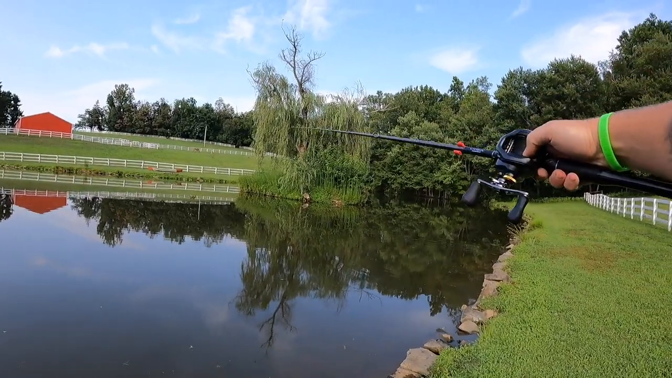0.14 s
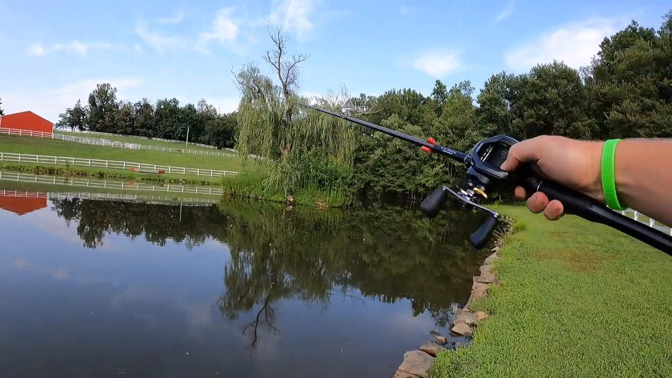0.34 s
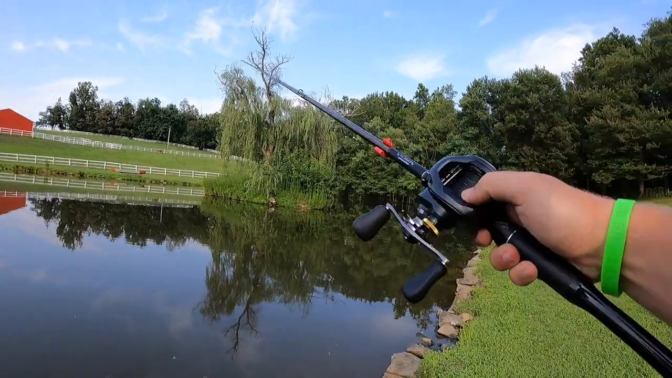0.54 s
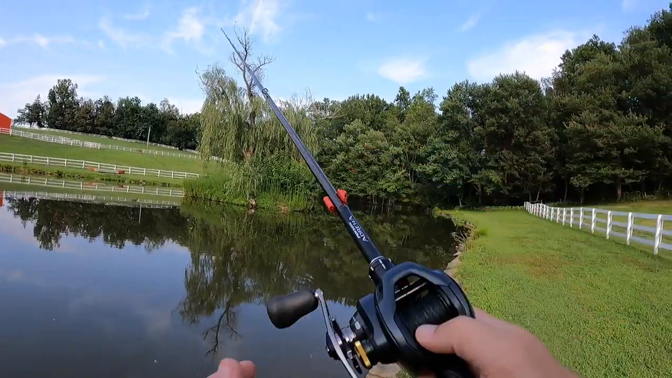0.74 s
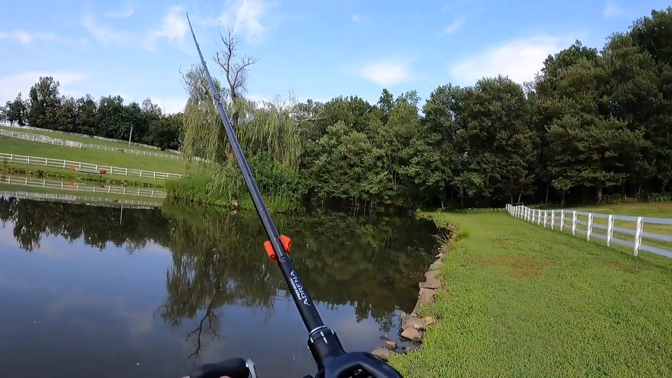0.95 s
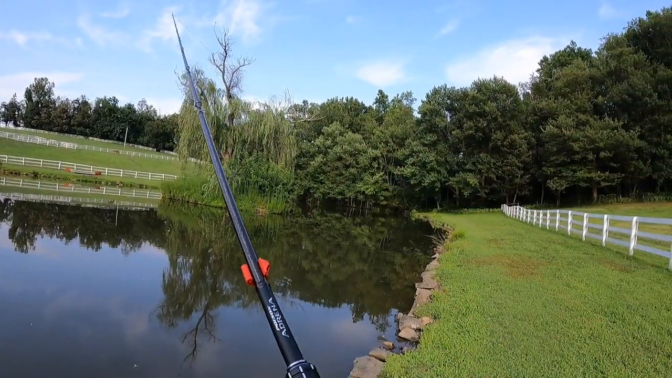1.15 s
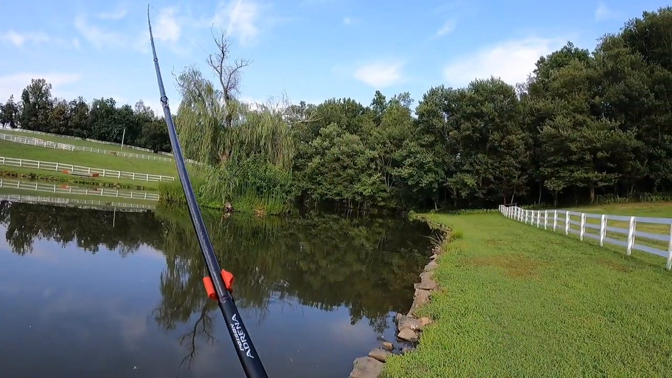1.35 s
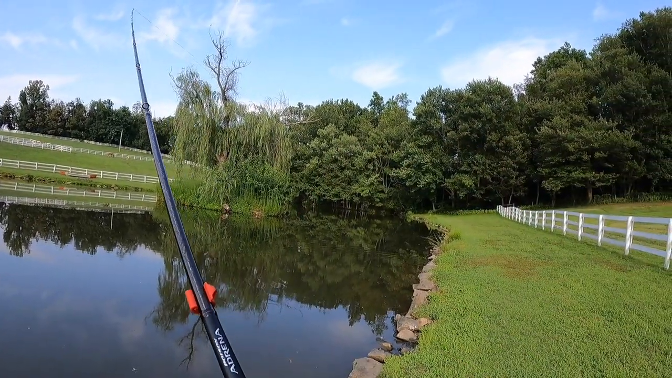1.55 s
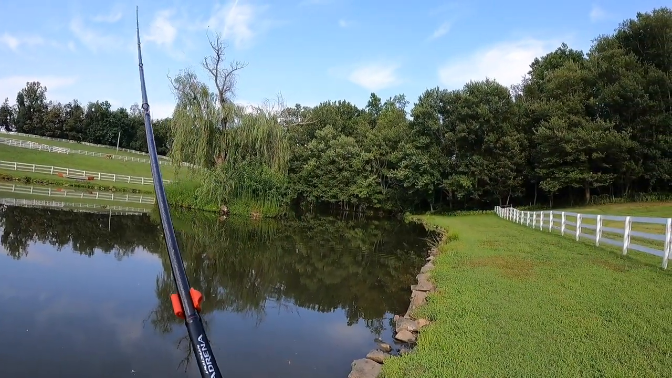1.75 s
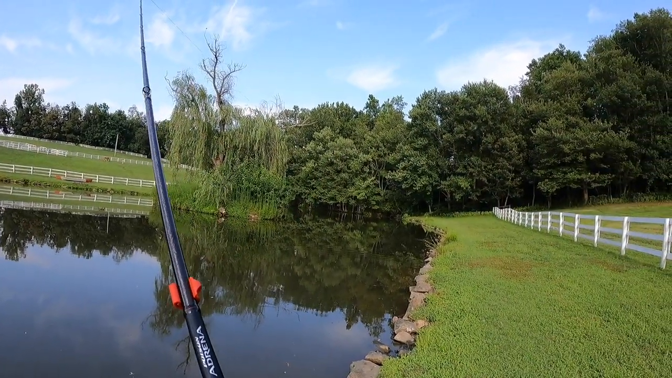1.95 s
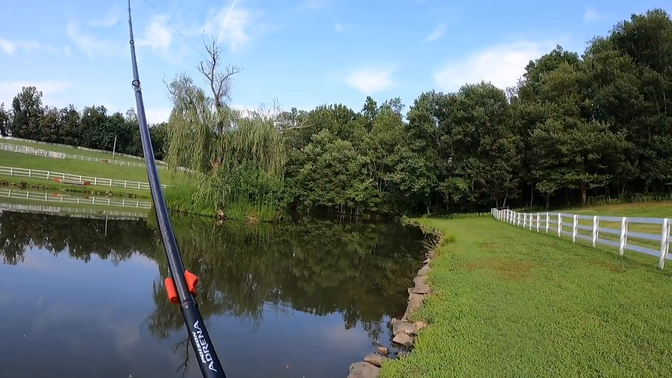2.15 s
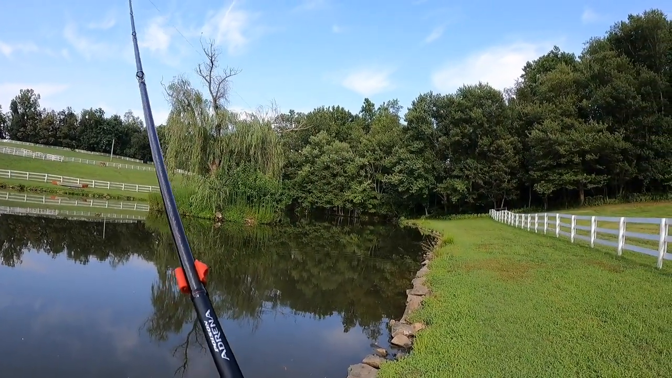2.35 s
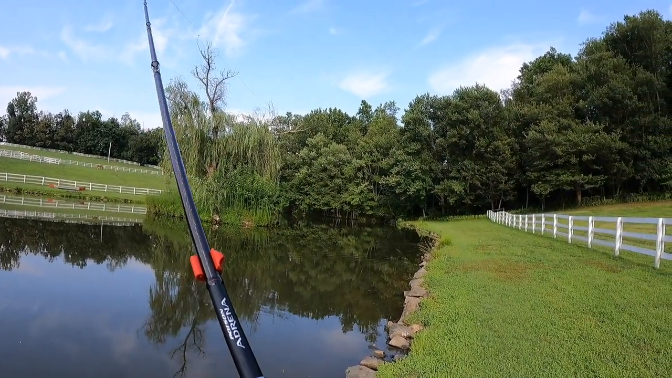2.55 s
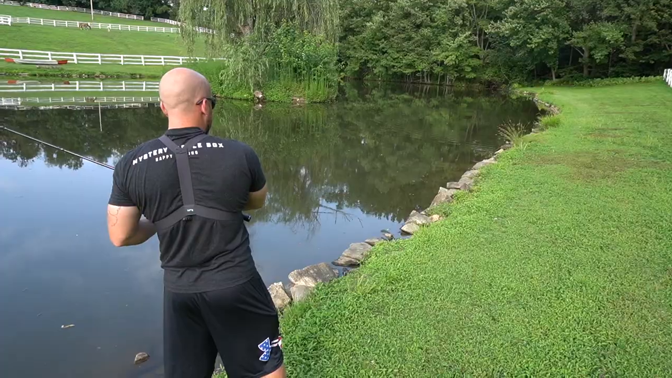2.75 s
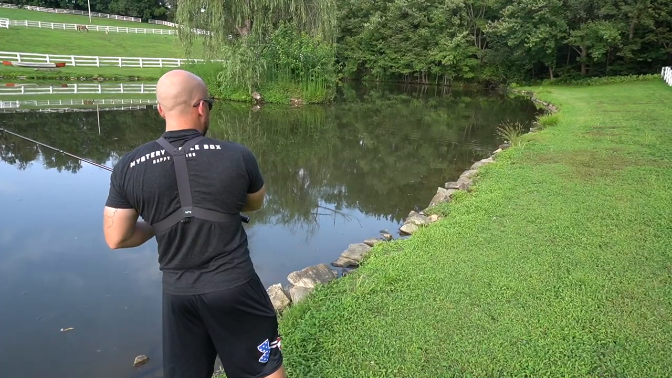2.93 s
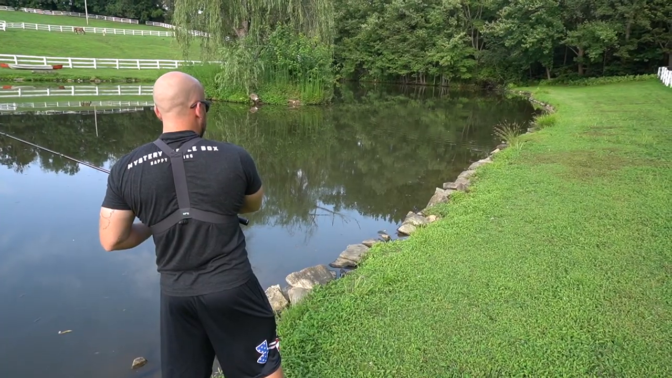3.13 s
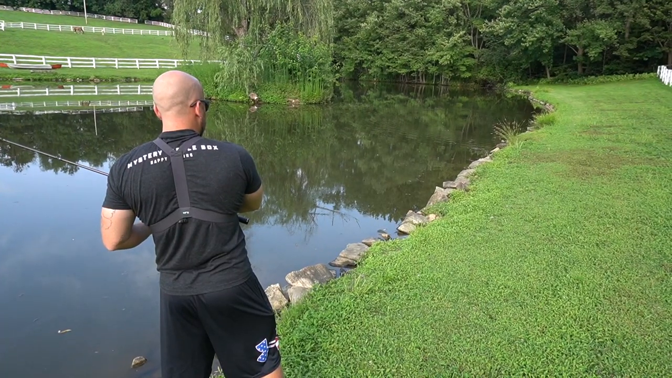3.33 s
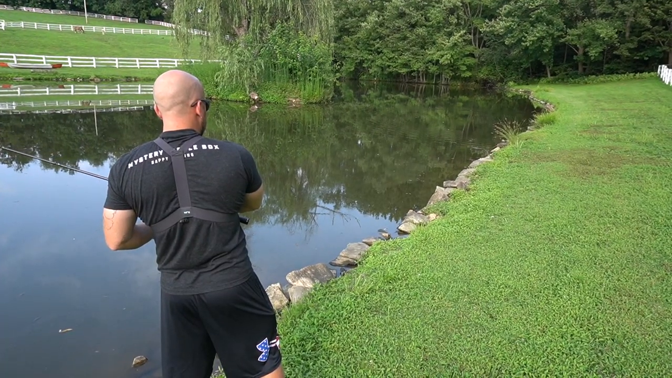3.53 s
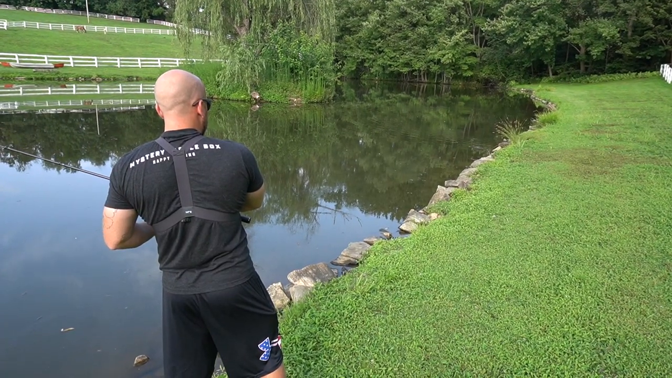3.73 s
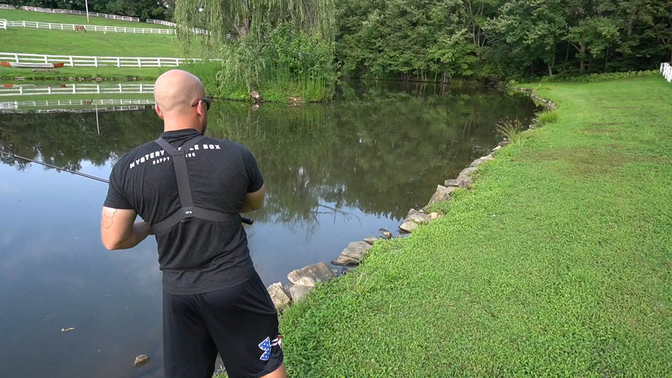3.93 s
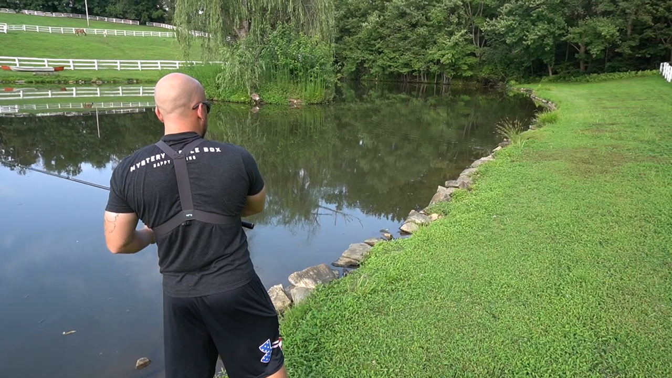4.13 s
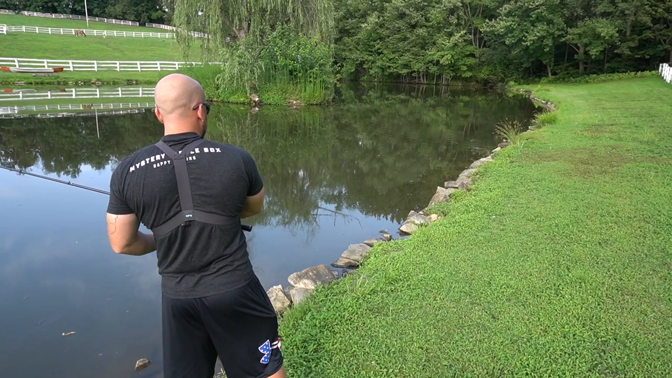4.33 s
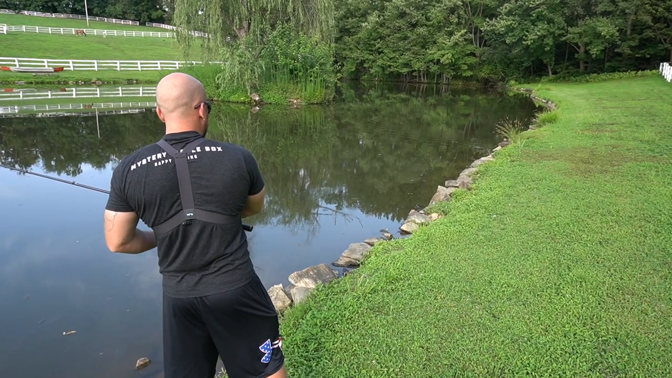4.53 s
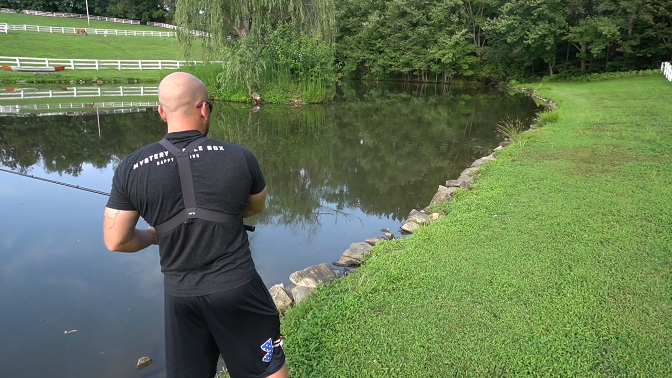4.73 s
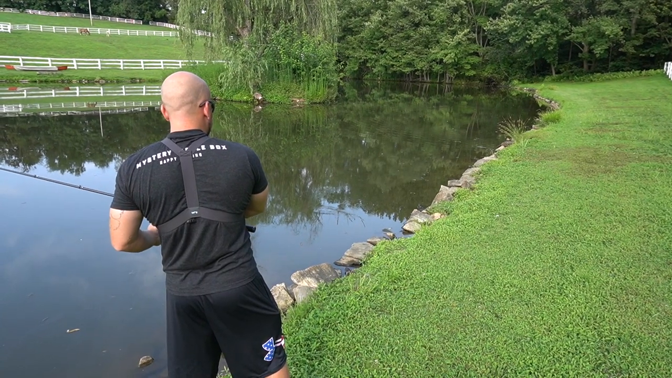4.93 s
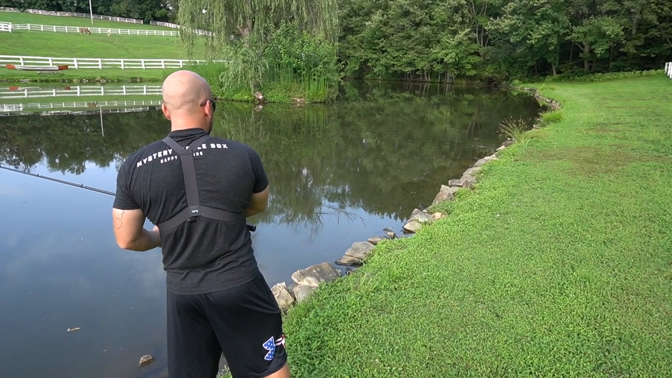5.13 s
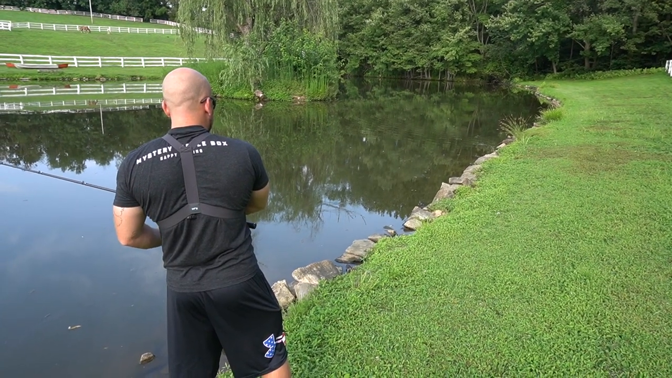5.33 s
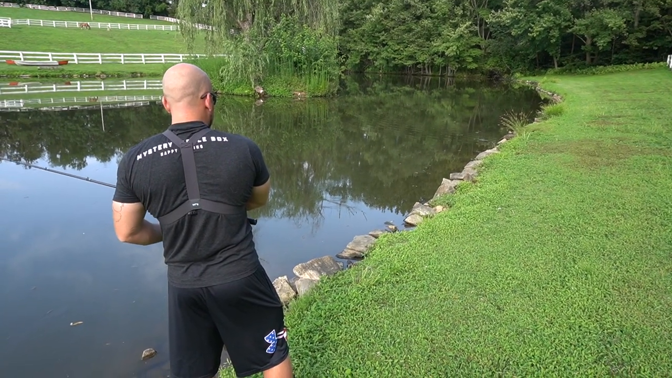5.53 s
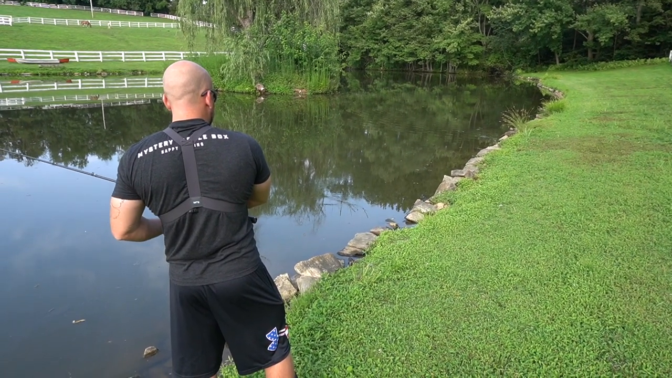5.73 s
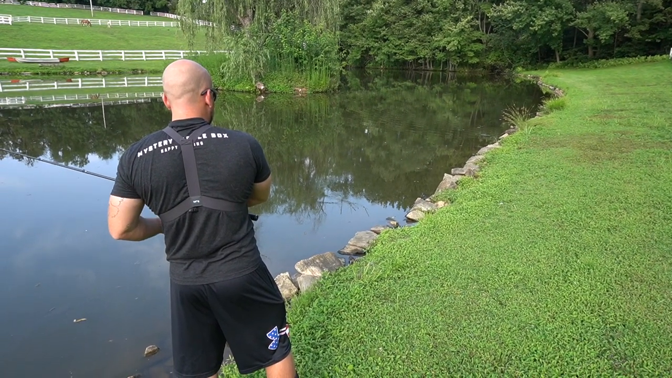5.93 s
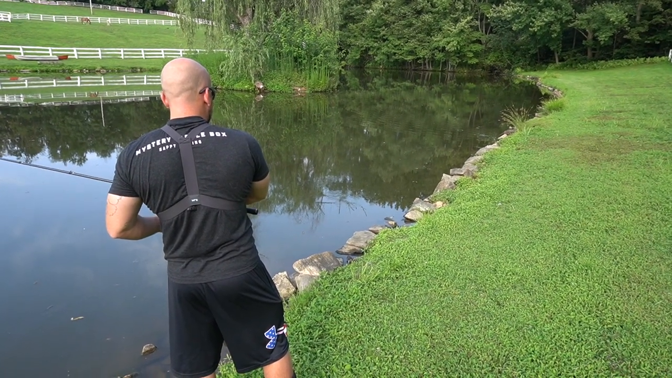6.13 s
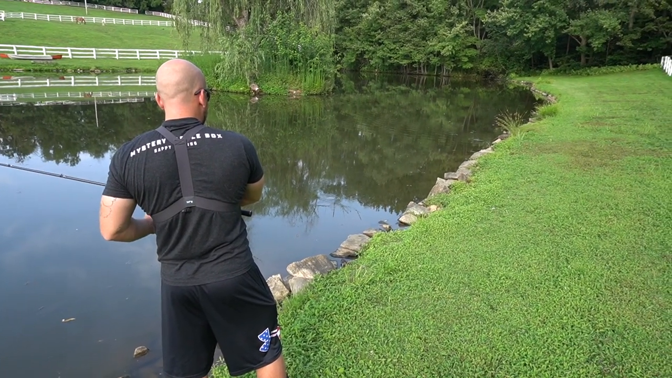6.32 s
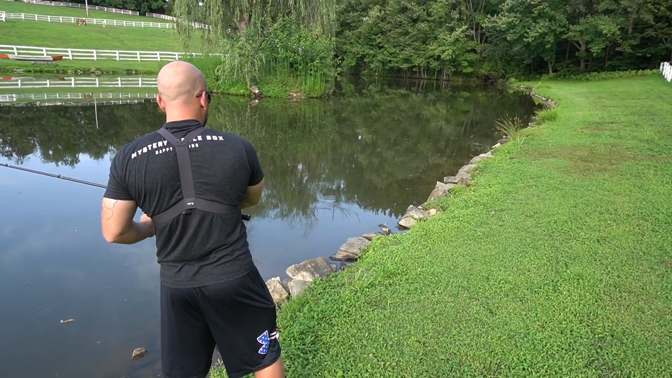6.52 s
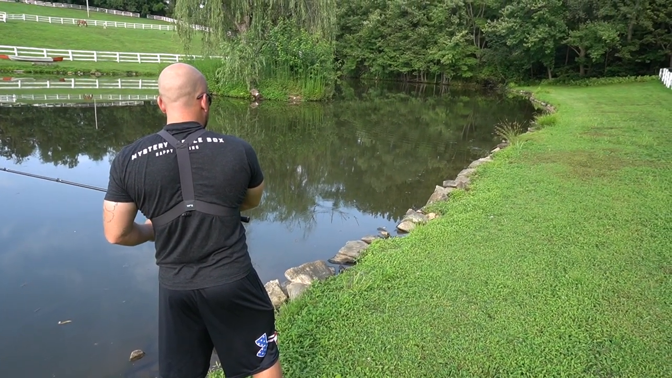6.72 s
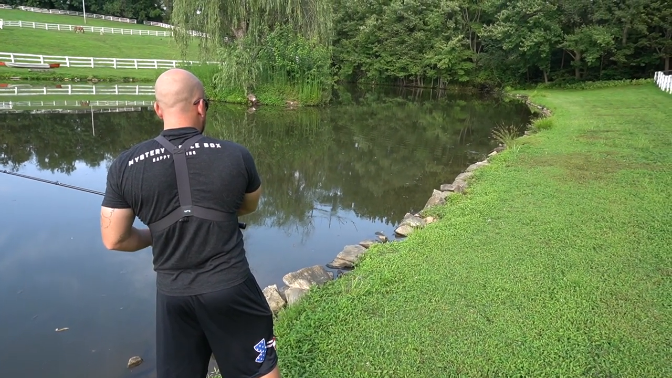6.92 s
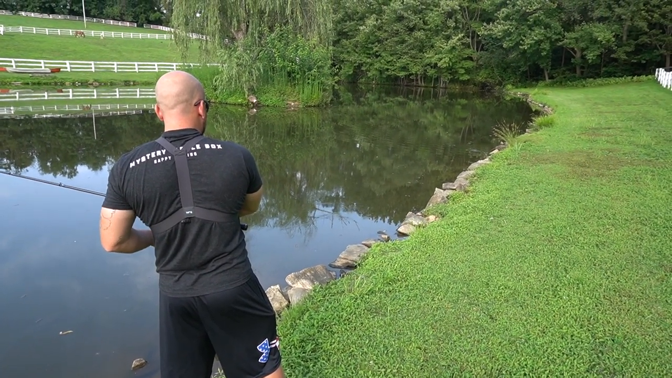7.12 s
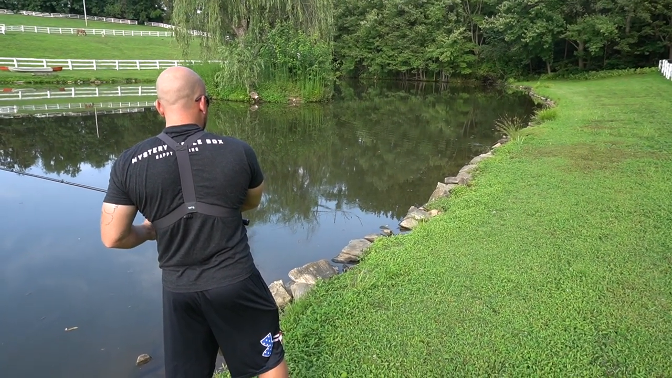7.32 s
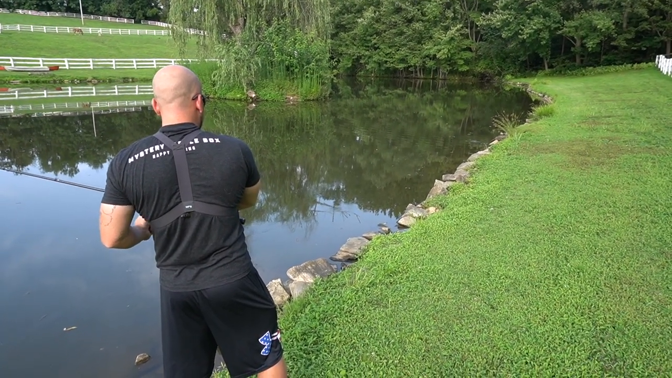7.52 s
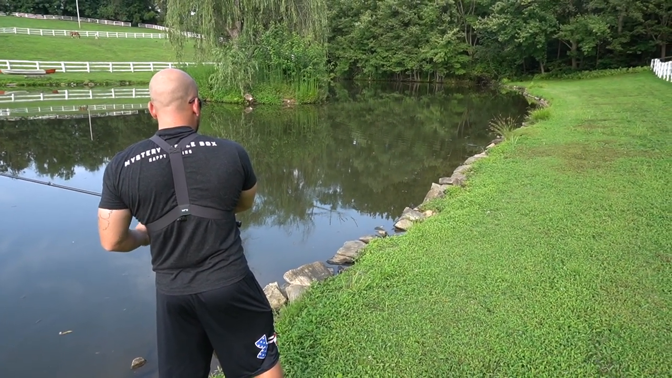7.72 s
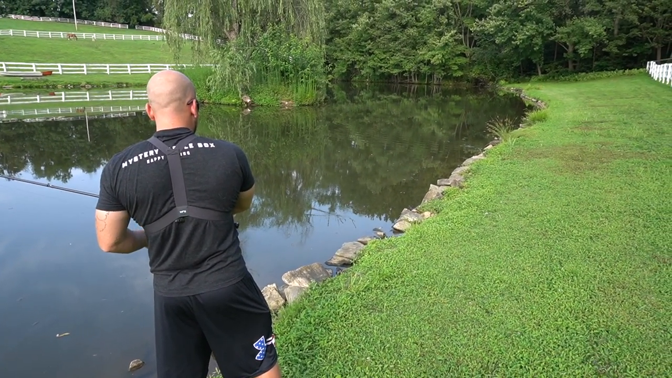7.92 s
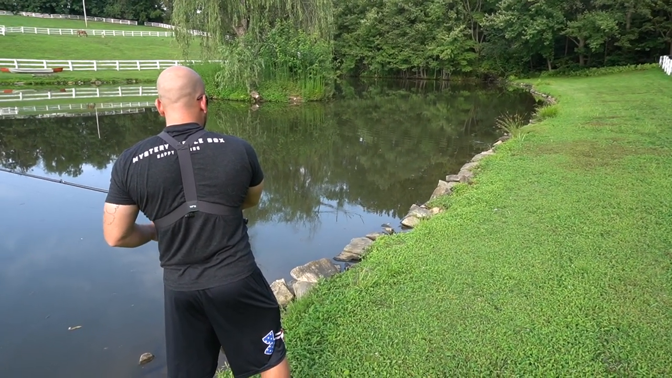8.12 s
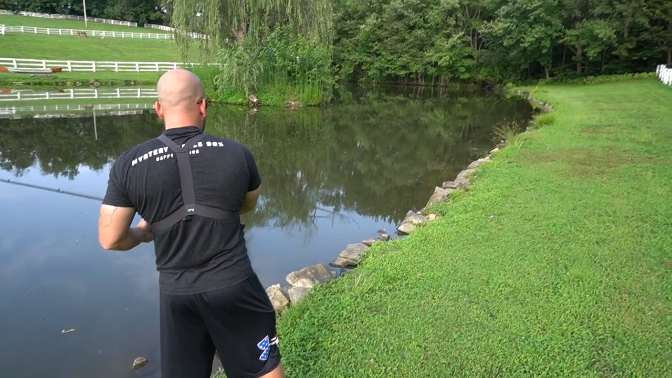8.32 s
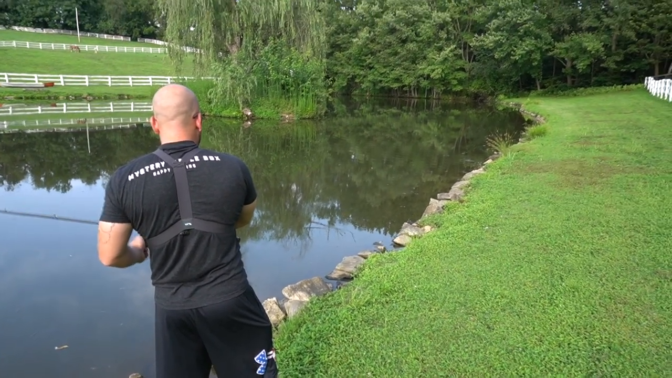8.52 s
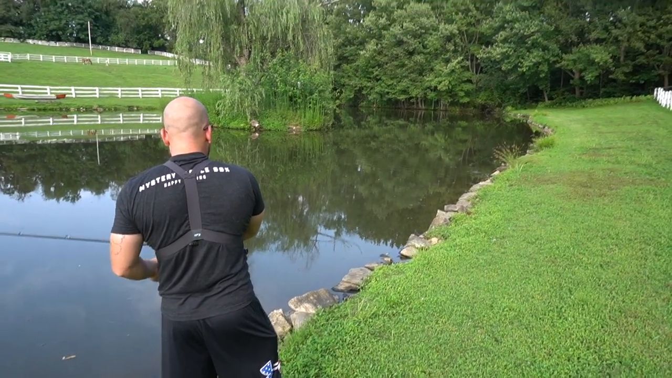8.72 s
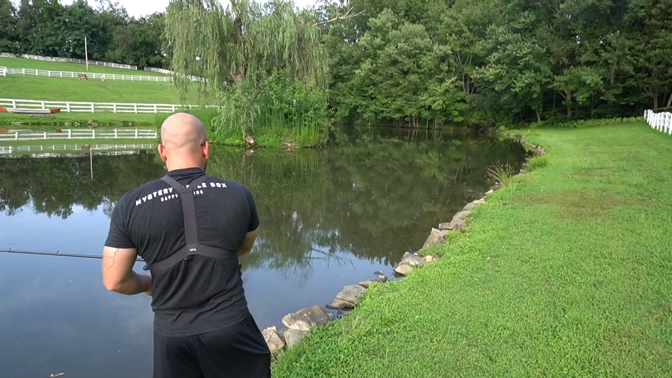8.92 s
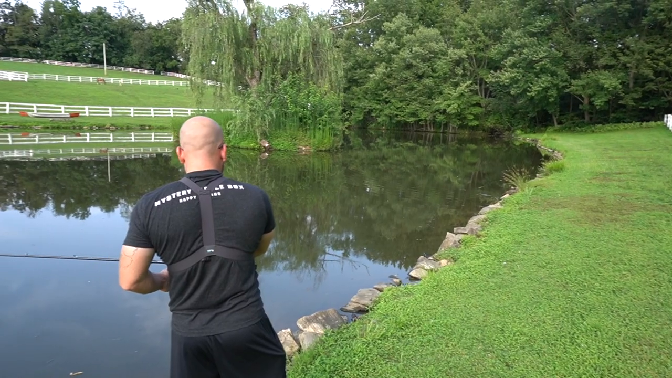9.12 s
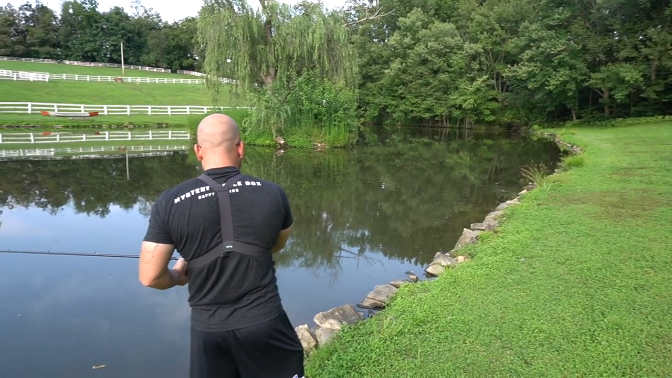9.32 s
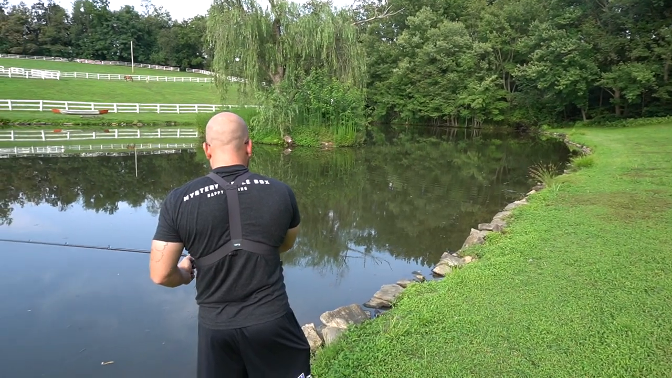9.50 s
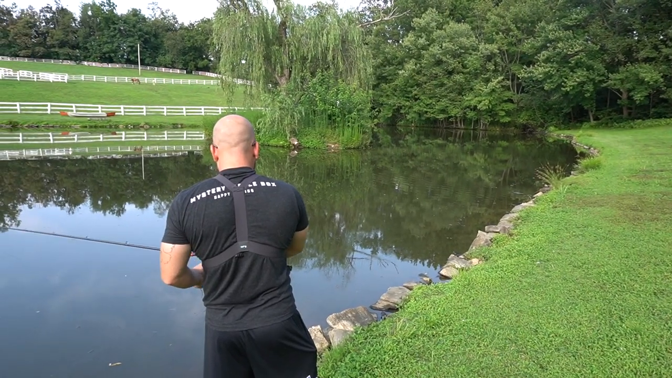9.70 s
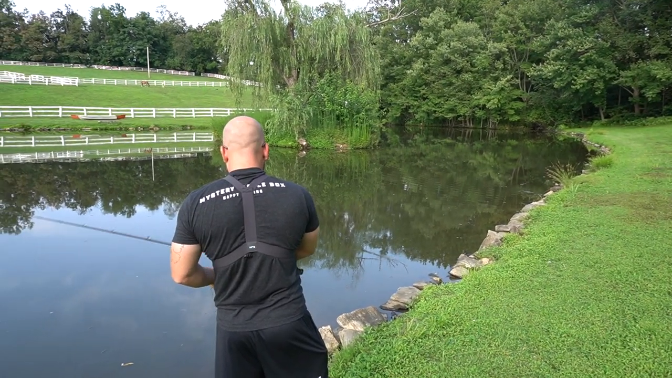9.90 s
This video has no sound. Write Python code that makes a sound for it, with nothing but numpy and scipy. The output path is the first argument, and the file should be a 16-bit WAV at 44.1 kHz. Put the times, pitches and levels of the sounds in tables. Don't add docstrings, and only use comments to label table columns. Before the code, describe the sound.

From 0 s, close stereo: a spool whirs with hissing line, strongest around 0.1 s and fading to rest by 1 s. A faint low rod swish comes near 0.3 s. From 0.35 to 0.59 s the braked line whistles roughly, holding high then dropping steeply, with a faint squeak and clicks. A distant crow caws at about 0.45, 0.9 and 1.45 s, echoing. Small ticks lead to a loud, crisp double-edged latch snap at 1.37 s with a woody thump, then lighter ticks until 1.77 s. A low motor hum surfaces near 1.7 and 2 to 2.7 s. At 2.68 s it switches to a quieter, distant mono microphone: steady open air, rhythmic high katydid buzzes, cricket ticking, chirps and flocks in the trees, briefly rustling leaves, faint hum and low gusts. Soft reel gear hiss runs from 9 to 9.7 s.

```python
import sys
import numpy as np
from scipy import signal
from scipy.fft import irfft, next_fast_len
from scipy.io import wavfile
from scipy.ndimage import uniform_filter1d

SR = 44100
rng = np.random.default_rng(int(sys.argv[2]) if len(sys.argv) > 2 else 0)


def field_ratio(decibels):
    return 10 ** (np.asarray(decibels, dtype=float) / 20)


def output_pcm(signal):
    pcm = np.clip(np.atleast_2d(signal).T, -1, 1) * 32767
    wavfile.write(sys.argv[1], SR, np.round(pcm).astype(np.int16))


N = 439236
T = np.arange(N) / SR
SIZE = next_fast_len(N)
LOG_HZ = np.log(np.arange(SIZE // 2 + 1) * SR / SIZE + 1)
CUT_S, THUMP_S, SPOOL_HZ = 2.682, 1.3752, 240

# time in seconds, hiss in dB, low whir relative to it in dB, left minus right in dB.
SPOOL_RUN = [(0.0, -50.5, -5.5, 1), (0.08, -42, -10, 3), (0.388, -48, -3.5, 0), (1.0, -67, 16.5, 5)]
# frequency in Hz, density in dB per Hz.
SPOOL_COLOUR = [(180, -0.5), (300, -3), (526, -10.5), (744, -8), (877, -7.5), (1280, -5), (1390, -8),
                (1750, -5.5), (3630, -8), (7140, 0), (12100, -16), (14800, -35), (15500, -56)]
# time in seconds, pitch in Hz, level in dB.
LINE_WHISTLE = [(.3, 4900, -66), (.36, 4740, -50), (.435, 4198, -42), (.475, 4140, -37.5),
                (.515, 4174, -37), (.545, 3040, -36.5), (.559, 2400, -25.5), (.572, 2003, -35),
                (.588, 1350, -55)]
# time in seconds, pitch in Hz, level in dB.
GUIDE_SQUEAK = [(.44, 887, -70), (.46, 938, -60), (.5, 1008, -50), (.56, 963, -47), (.59, 954, -63)]
# time in seconds, level in dB.
ROD_SWISH = [(.17, -68), (.22, -52.5), (.29, -48), (.36, -55), (.4, -68)]
# time in seconds, peak in dB, centre in Hz, T60 in seconds, left minus right in dB.
REEL_CLICKS = [(.558, -30, 2350, 0.11, -8), (.565, -37, 7000, 0.014, -1), (.599, -35, 4500, .008, 0),
               (1.0147, -38, 2200, 0.012, -1), (1.274, -23.5, 5600, 0.0026, -2),
               (1.2742, -27, 2300, .006, -.5), (1.3107, -23, 4000, 0.011, 0),
               (1.311, -32, 1099, 0.0297, -0.5), (1.349, -36, 6000, .012, -5),
               (1.355, -36.5, 4500, .01, -6.5), (1.6466, -49, 5000, .006, 1), (1.73, -34, 5800, 0.0088, 0),
               (1.7704, -47, 3700, .008, 4)]
# time in seconds, peak in dB, centre in Hz, T60 in seconds,
# left minus right in dB.
CLUTCH_LATCH = [(1.3619, -11, 5900, .008, 0), (1.3625, -22, 2500, .008, 0), (1.367, -22, 2300, .014, 0),
                (1.3704, -14, 5500, .016, 0), (1.3736, -1.5, 6300, .007, 0), (1.3739, -7, 2900, .009, 0),
                (1.3742, -19, 1050, .025, 0), (1.3762, -16, 3300, .02, 0)]
# frequency in Hz, level in dB, T60 in seconds.
FRAME_MODES = [(1156, -8, .06), (2380, -6, .025), (3451, -13.5, 0.029), (4760, -15.5, 0.026),
               (6210, -6.5, .014), (7700, -13, .02)]
# frequency in Hz, level in dB, T60 in seconds.
ROD_MODES = [(150, -26.5, .08), (277, -31.5, 0.033), (550, -25.5, 0.039), (1030, -26, 0.089)]
# time in seconds, level in dB.
CRANK_LEVEL = [(9.0, -82), (9.07, -64), (9.12, -59), (9.15, -67), (9.6, -66.5), (9.72, -76)]
# time in seconds, level in dB.
CAW_TIMES = [
    (.455, -49.5),
    (.92, -46.5),
    (1.46, -48.5),
]
# time from the call in seconds, throat resonance in Hz, level in dB.
CAW_GLIDE = [(-.02, 1108, -41), (0, 1125, -0.5), (.03, 1329, 4), (.06, 1332, 6), (.1, 1207, -3),
             (.14, 1130, -12), (.17, 1108, -45)]
# first buzz in seconds, last buzz in seconds, level in dB.
QUICK_KATYDID_PHRASES = [(.932, 2.767, -64.5), (3.024, 4.017, -65), (4.346, 5.582, -63),
                         (5.859, 7.346, -60.5), (7.664, 8.922, -65), (9.2, 9.75, -78)]
SLOW_KATYDID_PHRASES = [(1.081, 2.392, -62.5), (2.791, 4.74, -62), (5.035, 6.793, -61.5),
                        (7.074, 8.363, -61), (8.668, 9.848, -61)]
QUICK_GAP_S, SLOW_GAP_S = .255, .31
# start in seconds, end in seconds, level in dB.
QUICK_CRICKET_BOUTS = [(1.45, 2.9, -77)]
SLOW_CRICKET_BOUTS = [(2.75, 4.35, -75), (5.05, 7.3, -78.5), (7.3, 7.8, -80), (8.9, 9.96, -80.5)]
QUICK_TICK_HZ, SLOW_TICK_HZ = 28.4, 19.2
# time in seconds, level in dB.
TREE_CRICKET = [(.6, -65), (1.8, -77.5), (1.92, -69), (2, -71), (2.68, -78), (5, -78), (9.96, -78.5)]
# length in seconds, start pitch over end pitch.
CHIP_KIND = (.05, 1.5)
SLUR_KIND = (0.0453, 1.14)
WAIL_KIND = (.13, 1.2)
RISE_KIND = (0.0394, .84)
PEEP_KIND = (.075, 1.02)
# start in seconds, end pitch in Hz, level in dB.
CHIP_NOTES = [(3.21, 2700, -69), (5.335, 2950, -67), (6.82, 2800, -61.5), (7.6, 2900, -63),
              (8.25, 3000, -69), (8.97, 2850, -72)]
SLUR_NOTES = [(4.05, 3400, -65), (4.36, 3350, -66), (5.94, 3450, -68), (6, 3400, -66), (6.07, 3400, -72),
              (7.34, 4460, -68), (9.38, 3480, -63)]
WAIL_NOTES = [(3.65, 2090, -67), (4.63, 2860, -60), (6.57, 2255, -73), (7.02, 2220, -68)]
RISE_NOTES = [(2.98, 3090, -67), (3.08, 3150, -64), (7.38, 3500, -64)]
PEEP_NOTES = [(2.1, 2670, -67), (2.68, 4150, -64.5), (2.7, 3900, -67), (4.76, 2147, -63.5),
              (6.75, 2550, -64.5), (7.39, 4120, -74), (8.4, 2800, -69)]
# delay in seconds, length in seconds, start in Hz, end in Hz, level in dB.
SONG_PHRASE = [(0, 0.083, 3130, 3080, -0.5), (0.053, .055, 2850, 2280, -1.5), (0.182, .06, 2280, 2260, -7)]
# start in seconds, level in dB.
SONG_TIMES = [(4.07, -59.5), (7.48, -62), (8.035, -62), (8.27, -66)]
# peak in seconds, level in dB, fading in dB per second, high voices relative in dB.
FLOCK_OUTBURSTS = [(2.68, -69, 2.5, -1), (3.38, -64, 10.5, -2), (4.12, -62.5, 8.5, -6),
                   (6.9, -67.5, 21.5, -8), (7.51, -64, 7.5, -16), (9.09, -68, 5, 4)]
FLOCK_RISE_DB_S, HIGH_FADE_DB_S = 90, 9
# partial number, level in dB.
MEW_PARTIALS = [(4, -73), (5, -72), (6, -73), (7, -69)]
MEW_S, MEW_HALF_LENGTH_S, MEW_TOP_HZ, MEW_SAG_PER_S2 = 2.16, 0.12, 785, 4.5
# start in seconds, end in seconds, level in dB.
HUM_FIRST = [(1.7, 1.77, -42), (2, 2.68, -47), (3.45, 4.42, -62), (5.95, 7.6, -65.5), (6.4, 6.8, -74),
             (9.5, 9.85, -66)]
HUM_THIRD_BOUTS = [(.95, 1.45, -65.5), (2.4, 2.68, -63), (7.2, 7.7, -73.5), (8.92, 9.1, -67),
                   (9.1, 9.5, -74)]
HUM_FIRST_FLOOR_DB, HUM_THIRD_FLOOR_DB = -71, -76
# frequency in Hz, density in dB per Hz.
CHEST_AIR = [(8.8, -39), (15, -8), (123, 2), (184, -11.5), (685, -24.5), (1340, -23), (3120, -34.5),
             (6480, -35), (8420, -34.5), (9190, -26), (10000, -25), (11000, -85), (13400, -71),
             (14700, -43), (16000, -78)]
# frequency in Hz, side minus mid in dB.
CHEST_SIDE = [(100, -15), (300, -5.5), (1300, -3), (5000, -1), (8200, 0.5), (8500, -25)]
# time in seconds, level in dB.
CHEST_RUMBLE = [(0.0, -54), (0.07, -47.5), (1.34, -47), (1.38, -29), (1.42, -50.5), (2.64, -47.5),
                (2.68, -51)]
# frequency in Hz, density in dB per Hz.
MEADOW_AIR = [(18, -33), (30, -2), (60, -6), (108, -5.5), (181, -17.5), (305, -18), (997, -17.5),
              (1100, -18), (1560, -24.5), (2630, -25.5), (4650, -33.5), (6790, -33), (8600, -26),
              (11200, -11), (18900, -120)]
# time in seconds, level in dB.
GUSTS = [(2.7, -59.5), (3.12, -53), (5.47, -61), (5.73, -54.5), (6.52, -57.5), (9.07, -50.5), (9.37, -62),
         (9.78, -48.5), (9.96, -62)]
# time in seconds, level in dB.
WILLOW_LEAVES = [(2.68, -67), (3.0, -69), (3.6, -75), (4.2, -95)]


def level_db(table):
    s, db = np.transpose(table)
    return np.where((T < s[0]) | (T > s[-1]), -150., np.interp(T, s, db))


def pitch_and_level(table):
    s, hz, db = np.transpose(table)
    return np.interp(T, s, hz), level_db(np.transpose([s, db]))


def unit(x):
    return x / np.sqrt(np.mean(x ** 2))


def shape(table, closed=False):
    hz, db = np.transpose(table)
    outside = -200. if closed else None
    return field_ratio(np.interp(LOG_HZ, np.log(hz), db, outside, outside))


def noise(gain):
    real, imaginary = rng.standard_normal((2, len(gain))) * np.sqrt(SIZE / 2)
    return irfft((real + 1j * imaginary) * gain, SIZE)[:N]


def hiss(table):
    return unit(noise(shape(table, closed=True)))


def band(x, hz, width_hz, order=1):
    edges_hz = [max(hz - width_hz / 2, 2), min(hz + width_hz / 2, .45 * SR)]
    return signal.sosfilt(signal.butter(order, edges_hz, "band", fs=SR, output="sos"), x)


def walk(rate_hz):
    held = np.repeat(rng.standard_normal(int(N / SR * rate_hz) + 2), repeats=4)
    smooth = unit(uniform_filter1d(uniform_filter1d(held, size=4), size=4))
    return np.interp(T, np.linspace(0, N / SR, len(smooth)), smooth)


def turns(hz):
    return 2 * np.pi * np.cumsum(hz * np.ones(N)) / SR


def throb(hz, sharp, jitter):
    return unit(np.exp(sharp * np.cos(turns(hz * (1 + jitter * walk(30))))))


def bursts(table, length_s):
    out = np.zeros(N)
    for s, db in table:
        i = slice(max(int((s - 3 * length_s) * SR), 0), int((s + 3 * length_s) * SR))
        out[i] += field_ratio(db) * np.exp(-((T[i] - s) / length_s) ** 2)
    return out


def bouts(table, edge_s):
    return sum(field_ratio(db) * np.clip(np.minimum(T - start, end - T) / edge_s + .5, 0, 1)
               for start, end, db in table)


def pan(x, db):
    return x * field_ratio(np.array([db / 2, -db / 2]).reshape(2, -1))


def trees(x, t60_s, wet_db, echo_s, echo_db):
    t = T[:int(1.5 * SR)]
    tail = rng.standard_normal((2, len(t))) * 1000. ** (-t / t60_s)
    tail *= field_ratio(wet_db) * np.sqrt(2 * np.log(1000) / (SR * t60_s))
    tail *= 1 + field_ratio(echo_db) * np.exp(-((t - echo_s) / 0.01) ** 2)
    return x + signal.fftconvolve(x[None], tail, axes=1)[:, :N]


def spool():
    s, *columns = np.transpose(SPOOL_RUN)
    hiss_db, whir_db, pan_db = (np.interp(T, s, column) for column in columns)
    hiss_db = np.where((T < s[0]) | (T > s[-1]), -150., hiss_db)
    out = 0
    for spread in (np.array([[1], [1]]), .5 * np.array([[1], [-1]])):
        run = noise(shape(SPOOL_COLOUR)) * (1 + 0.27 * throb(SPOOL_HZ, 0.83, 0.034))
        low = band(run, 1970, 3700)
        line_hiss = field_ratio(-2.0 + walk(23)) * unit(run - low)
        whir = field_ratio(whir_db + 2.0 + walk(25.1)) * unit(low)
        out = out + spread * (line_hiss + whir)
    coast = np.clip((1 - T) / 0.43, 0, 1)
    return pan(out * field_ratio(hiss_db) * coast, pan_db)


def whistle():
    hz, db = pitch_and_level(LINE_WHISTLE)
    phase = turns(hz * (1 + .03 * walk(500) + .02 * walk(1500)))
    tone = unit(1 + .45 * walk(900)) * np.sin(phase)
    half_gain = field_ratio(-10) * np.clip((hz - 2500) / 1500, 0, 1)
    half = half_gain * (.8 + .6 * walk(400)) * np.sin(phase / 2)
    double_gain = field_ratio(-7.5) * np.clip((hz - 3000) / 1100, 0, 1)
    double = double_gain * walk(1800) * np.sin(2 * phase)
    line = field_ratio(db + 1.2 * walk(60)) * (tone + half + double) * throb(SPOOL_HZ, .45, .03)
    return pan(line, -3.5)


def guide_squeak():
    hz, db = pitch_and_level(GUIDE_SQUEAK)
    squeak = field_ratio(db + 1.5 * walk(50.0)) * np.sin(turns(hz * (1 + 0.014 * walk(99.4))))
    return pan(squeak, .1)


def rod_swish():
    swish = field_ratio(level_db(ROD_SWISH)) * unit(band(rng.standard_normal(N), 300, 95))
    return pan(swish, -5.0)


def clutch():
    out, t = np.zeros((2, N)), T[:SR // 6]

    def mode(hz, db, t60_s):
        return field_ratio(db) * np.sin(2 * np.pi * hz * t) * 1000. ** (-t / t60_s)

    ring = sum(mode(*row) for row in FRAME_MODES)
    for s, db, hz, t60_s, pan_db in list(REEL_CLICKS) + list(CLUTCH_LATCH):
        blow = 1000. ** (-t / t60_s) * np.minimum(t / 0.00021, 1)
        mid, side = rng.standard_normal((2, len(t))) * blow
        rattle = band(np.array([mid + .3 * side, mid - .3 * side]), hz, .72 * hz)
        rattle = rattle + field_ratio(-31.5) * signal.fftconvolve(rattle, ring[None], axes=1)[:, :len(t)]
        rattle = band(rattle, 4300, 10060, order=3)
        i = int(s * SR)
        out[:, i:i + len(t)] += pan(rattle * field_ratio(db) / np.abs(rattle.mean(axis=0)).max(), pan_db)
    i = int(THUMP_S * SR)
    out[:, i:i + len(t)] += sum(mode(*row) for row in ROD_MODES)
    return out


def crank():
    gears = hiss([(1500, -8), (2600, -3), (3700, -6), (4800, 2), (5800, -1), (6800, -16)])
    db = level_db(CRANK_LEVEL) + .1 + 2.2 * walk(250) + walk(30)
    return field_ratio(db) * gears * throb(15.5, .15, .2)


def crow():
    caws = np.concatenate([np.array(CAW_GLIDE) + [s, 0, db] for s, db in CAW_TIMES])
    hz, db = (np.interp(T, caws[:, 0], column) for column in caws.T[1:])
    voice = np.sin(turns(hz * (1 + .035 * walk(250)))) * throb(85, .7, .08)
    return trees(field_ratio(db) * voice * (T < caws[-1, 0]), 1.24, -1.5, 0.143, 12.0)


def buzzes():
    rows = []
    for phrases, gap_s in ((QUICK_KATYDID_PHRASES, QUICK_GAP_S), (SLOW_KATYDID_PHRASES, SLOW_GAP_S)):
        for first, last, db in phrases:
            count = round((last - first) / gap_s) + 1
            rows += [(s, db) for s in np.linspace(first, last, count)]
    return np.array(rows) + [.006, 1.5] * rng.standard_normal((len(rows), 2))


def katydids(buzz_rows):
    wing = [(8400, -38), (8900, -4.0), (9180, 1), (9500, -8), (9900, -27.5)]
    buzz = unit(sum(throb(rate, 1.0, .03) * hiss(wing) for rate in (105, 113)))
    swell = bursts(buzz_rows, 0.033)
    rasp_gain = np.roll(swell, int(.05 * SR)) * field_ratio(-20 + 3.6 * walk(6))
    rasp_gain = rasp_gain + field_ratio(-82.5 + 4.1 * walk(8)) * (T < CUT_S)
    nearness = field_ratio(np.where(T < CUT_S, 5.0, 0))
    rasp = hiss([(9500, -28), (9900, 6.0), (10150, -5.5), (10350, -6.5), (10500, -45.5)])
    return buzz * (swell * field_ratio(-3.5) + field_ratio(-69.5)) + rasp * rasp_gain * nearness


def crickets():
    chirp = [(7600, -24), (7850, -12), (7960, 3), (8100, 3), (8400, -22)]
    ticks = 0
    for table, hz in ((QUICK_CRICKET_BOUTS, QUICK_TICK_HZ), (SLOW_CRICKET_BOUTS, SLOW_TICK_HZ)):
        ticks = ticks + bouts(table, .08) * throb(hz, 3., .012) * hiss(chirp)
    trill = throb(47, .6, .01) * np.sin(turns(7280 * (1 + 0.00297 * walk(100))))
    return ticks + field_ratio(level_db(TREE_CRICKET)) * unit(trill)


def notes(table):
    out, unsteady = np.zeros(N + SR), np.append(walk(150), np.zeros(SR))
    for s, length_s, start_hz, end_hz, db in table:
        i, t = int(s * SR), T[:int(length_s * SR)]
        hz = end_hz + (start_hz - end_hz) * (1 - t / length_s) ** 1.4
        hz = hz * (1 + .012 * unsteady[i:i + len(t)])
        swell = np.sqrt(np.sin(np.pi * t / length_s))
        out[i:i + len(t)] += field_ratio(db) * np.sin(2 * np.pi * np.cumsum(hz) / SR) * swell
    return out[:N]


def bird_calls():
    kinds = ((CHIP_KIND, CHIP_NOTES), (SLUR_KIND, SLUR_NOTES), (WAIL_KIND, WAIL_NOTES),
             (RISE_KIND, RISE_NOTES), (PEEP_KIND, PEEP_NOTES))
    single = [(s, length_s, hz * fall, hz, db) for (length_s, fall), rows in kinds for s, hz, db in rows]
    return single + [np.add(note, [s, 0, 0, 0, db]) for s, db in SONG_TIMES for note in SONG_PHRASE]


def mew():
    arch = np.clip(1 - MEW_SAG_PER_S2 * (T - MEW_S) ** 2, .5, 1)
    phase = turns(MEW_TOP_HZ * arch * (1 + .006 * walk(80)))
    swell = np.exp(-((T - MEW_S - .04) / MEW_HALF_LENGTH_S) ** 2)
    return swell * sum(field_ratio(db) * np.sin(k * phase) for k, db in MEW_PARTIALS)


def flock_db(fade_db_s, high):
    return np.max([db + high * high_db
                   + np.minimum(FLOCK_RISE_DB_S * (T - s), -(fading + fade_db_s) * (T - s))
                   for s, db, fading, high_db in FLOCK_OUTBURSTS], axis=0)


def flock():
    low_db, high_db = flock_db(0, high=0), flock_db(HIGH_FADE_DB_S, high=1)
    out = 0
    for db, low_hz, high_hz in ((low_db - 5.0, 2150, 3150), (high_db - 9, 3500, 3950)):
        s, length, pitch, slide = rng.random((200, 4)).T
        place = .5 * np.round(pitch) + .5 * pitch + 0.202 * (length - .5)
        hz = low_hz + (high_hz - low_hz) * place
        rows = np.transpose([s * N / SR, 0.0288 + 0.054 * length, hz * (1 + .3 * slide), hz, -6 * slide])
        out = out + field_ratio(db) * unit(notes(rows))
    return out


def birds():
    waver = field_ratio(2.5 * walk(70))
    single = (notes(bird_calls()) + field_ratio(-2.5) * mew()) * waver
    crowd = flock() * waver
    return trees(single + crowd, 1.45, 1.3, 0.108, 0.7) - 0.62 * crowd


def motor():
    first = bouts(HUM_FIRST, 0.09) + field_ratio(HUM_FIRST_FLOOR_DB)
    third = bouts(HUM_THIRD_BOUTS, 0.11) + field_ratio(HUM_THIRD_FLOOR_DB)
    phase = turns(122.5 * (1 + 0.011 * walk(12)))
    partials = ((1, first * field_ratio(-0.04)), (2, field_ratio(-77) + first * field_ratio(-22.5)),
                (3, third), (9, field_ratio(-75.5 + 4.06 * walk(40))))
    return sum(gain * field_ratio(2.6 * walk(12)) * np.sin(k * phase) for k, gain in partials)


def chest_air():
    air = shape(CHEST_AIR) * shape([(8300, -2.0), (8900, -1), (10400, -9.5), (10500, -4)])
    above_rumble = air * shape([(300, -80), (301, 1.5)])
    scale = field_ratio(-57) / np.sqrt(np.mean(above_rumble ** 2))
    air = air * shape([(100, -22), (400, 1)])
    side = noise(air * shape(CHEST_SIDE)) * field_ratio(-1.7)
    return scale * (noise(air) + np.array([[1], [-1]]) * side)


def chest_rumble():
    low = shape([(15, -6.5), (40, 0.5), (100, 2.5), (200, -9.5), (400, -27.0), (1000, -74)])
    rumble = unit(noise(low)) + field_ratio(-17.5) * np.array([[1], [-1]]) * unit(noise(low))
    return rumble * field_ratio(level_db(CHEST_RUMBLE) - 0.9 + 0.836 * walk(16))


def wind():
    push = unit(noise(shape([(3, -6.0), (12, 1), (22, -1.5), (40, -43), (80, -66)])))
    return field_ratio(level_db(GUSTS) + 2.7) * push


def meadow():
    limits = shape([(20, -34), (35, -3.5), (8600, -3.5), (9600, -4), (9800, -90)])
    return field_ratio(-58.5 + 0.32 * walk(3)) * unit(noise(shape(MEADOW_AIR) * limits))


def leaves():
    return field_ratio(level_db(WILLOW_LEAVES)) * hiss([(3600, 4), (4600, -4), (6500, -7)])


def far_hiss(buzz_rows):
    load = np.roll(bursts(buzz_rows, .06), int(.02 * SR)) * field_ratio(4.0 * walk(4))
    out = field_ratio(-92.5) * hiss([(13800, 1), (15600, -1.0), (15900, -30)])
    for low_hz, high_hz, limit_db, db in ((9750, 10300, -60, -78), (10300, 11800, -66, -91),
                                          (11800, 12700, -63, -91.5), (12700, 13800, -58, -91.5)):
        spare = uniform_filter1d(1. * (load * field_ratio(2 * walk(20)) < field_ratio(limit_db)), size=600)
        out += field_ratio(db) * spare * hiss([(low_hz, 0), (high_hz, -1)])
    return out


def scene():
    buzz_rows = buzzes()
    life = katydids(buzz_rows) + crickets() + birds() + motor()
    reel = spool() + whistle() + guide_squeak() + rod_swish() + clutch()
    near = reel + crow() + life + chest_air() + chest_rumble()
    far = crank() + life.mean(axis=0) + wind() + meadow() + leaves() + far_hiss(buzz_rows)
    fade = np.clip((T - CUT_S) / 0.021, 0, 1)
    return near * (1 - fade) + far * fade


def roll_off(x):
    return signal.sosfilt(signal.butter(12, 16560, fs=SR, output="sos"), x)


def record(dry):
    over = np.maximum(np.abs(dry).max(axis=0) - .2, 0)
    pole = np.exp(-1 / (0.015 * SR))
    held = signal.lfilter([1], [1, -pole], np.roll(over, int(.014 * SR)))
    mix = dry / (1 + 0.5 * uniform_filter1d(held, size=500))
    return roll_off(mix)


dry = scene()
out = record(dry)
output_pcm(out)
```